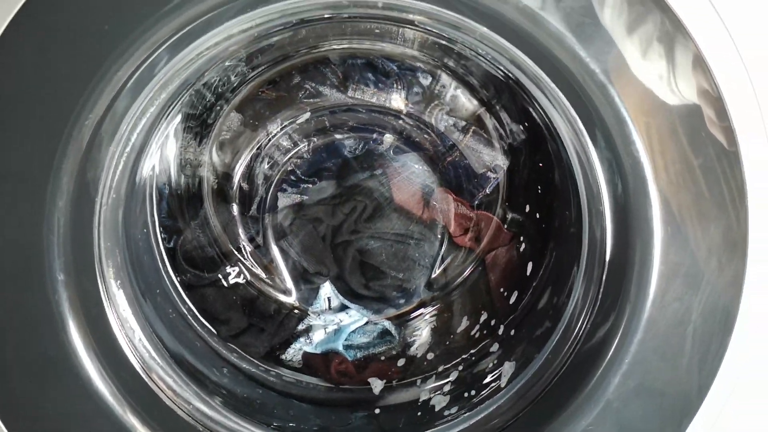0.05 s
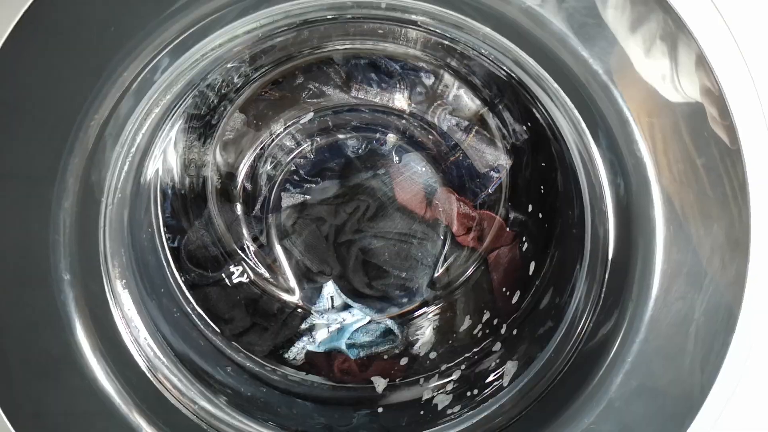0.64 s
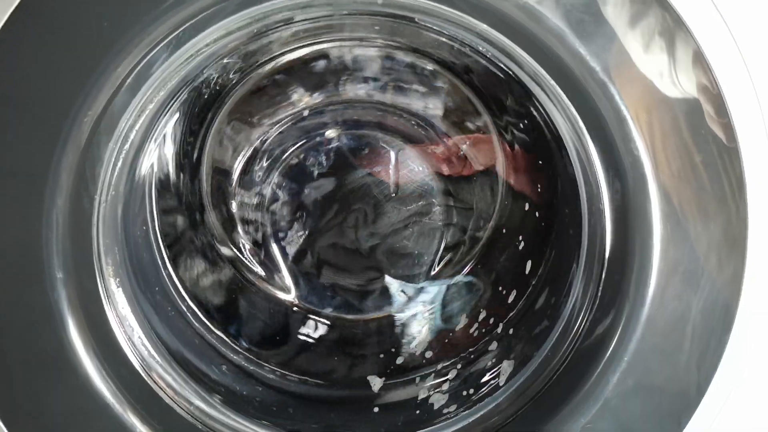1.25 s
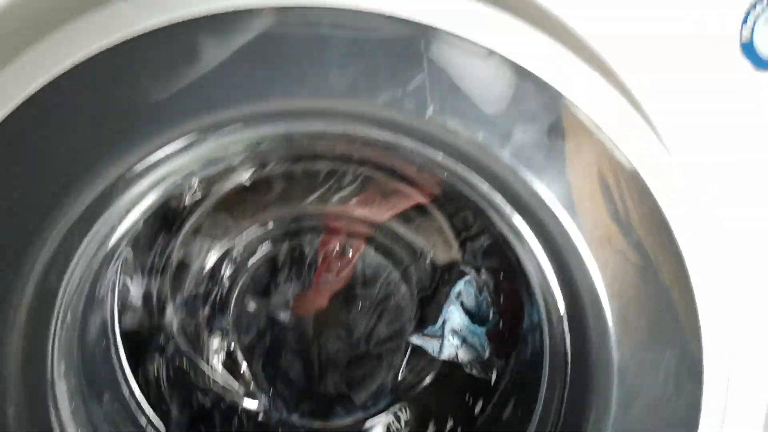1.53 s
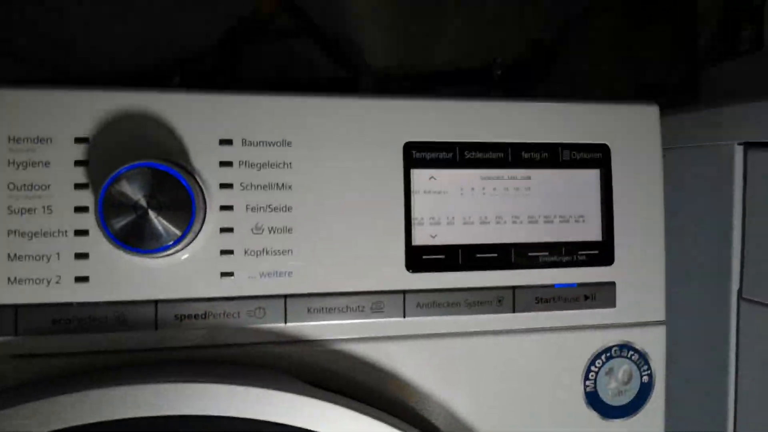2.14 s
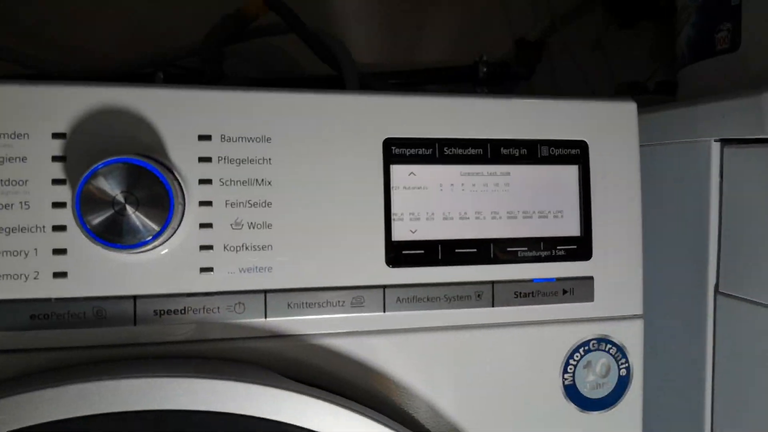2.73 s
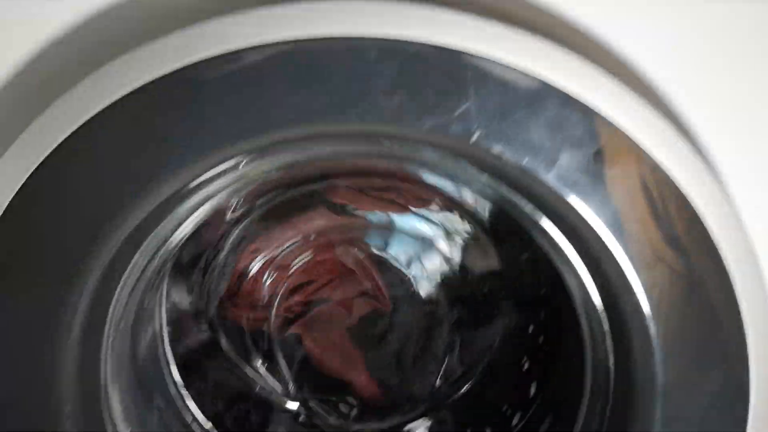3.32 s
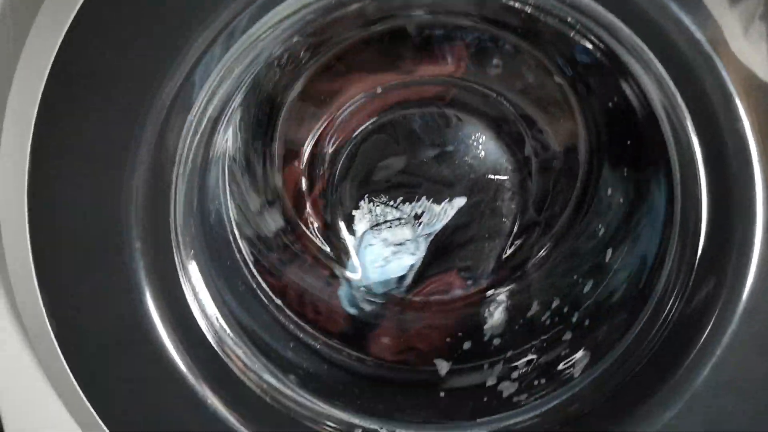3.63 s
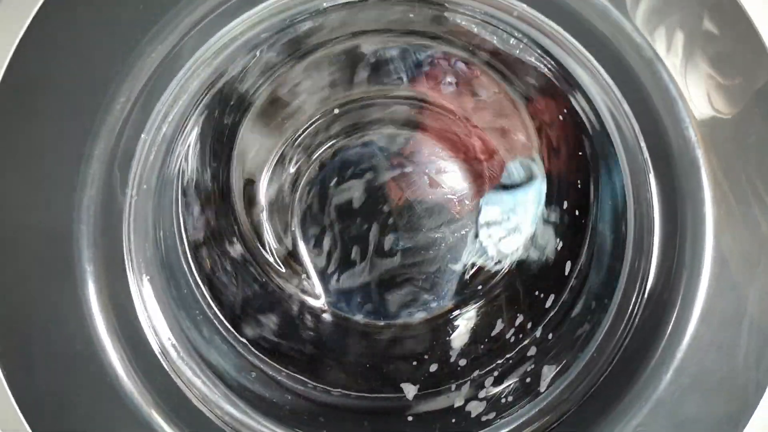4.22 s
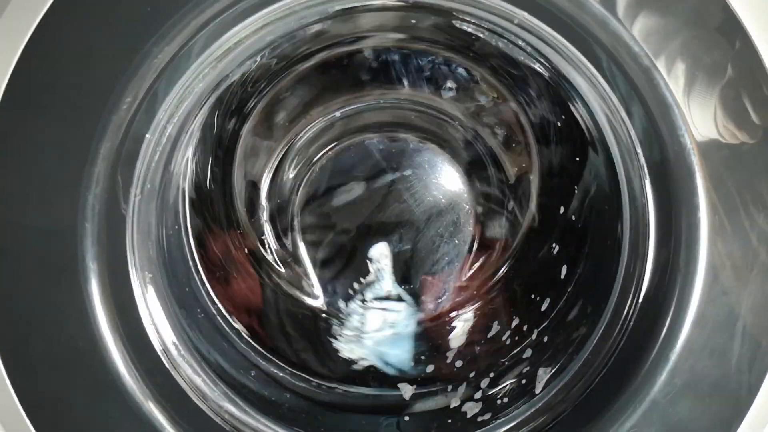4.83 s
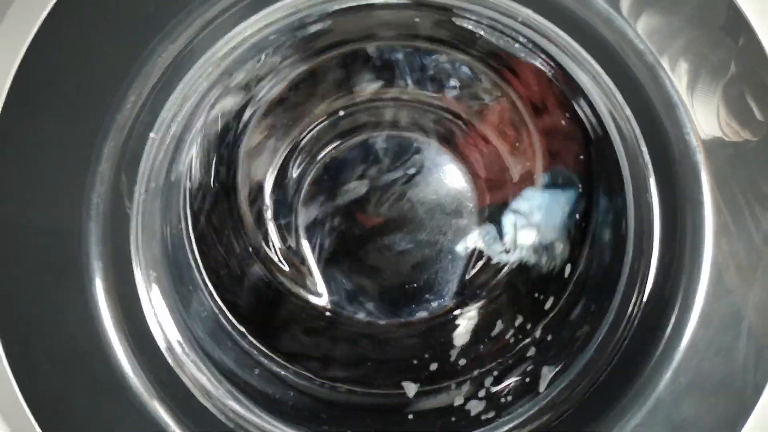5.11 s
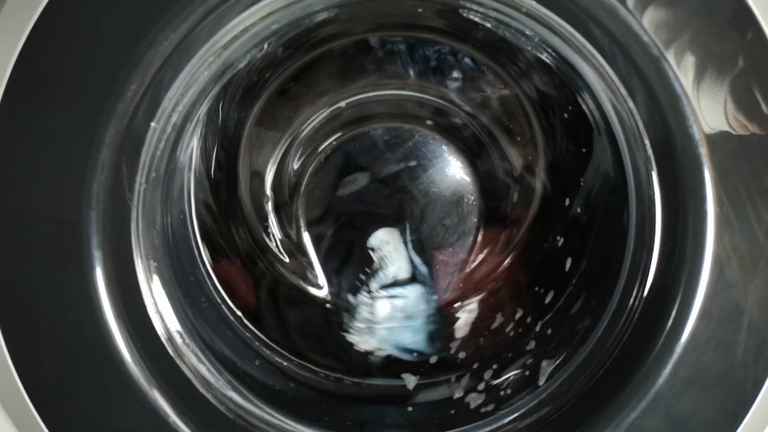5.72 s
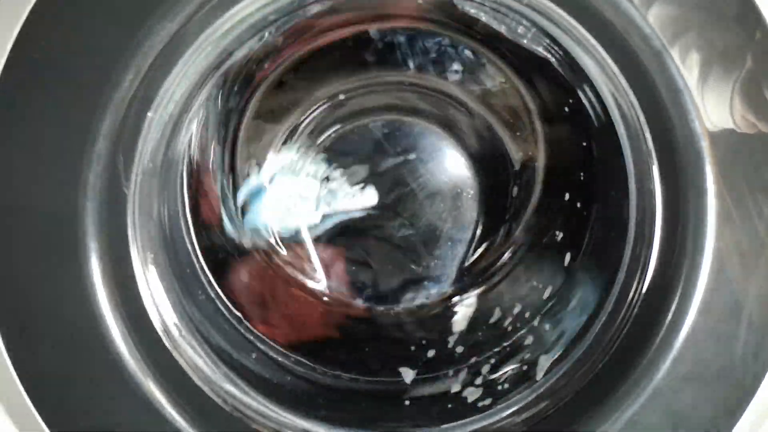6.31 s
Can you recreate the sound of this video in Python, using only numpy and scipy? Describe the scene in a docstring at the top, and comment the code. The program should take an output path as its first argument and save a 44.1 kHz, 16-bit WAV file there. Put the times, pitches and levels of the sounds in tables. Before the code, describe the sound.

A front-loading washing machine turns wet laundry, heard close to its door in a small hard room. A low electric hum with a deep tub rumble runs throughout, swelling and dipping briefly at uneven intervals. Behind the glass, quieter water sloshes and gurgles while wet cloth swishes, drips and lightly slaps the drum. The hum is strong for the first 1.6 seconds, then sinks low from about 1.8 to 3.4 seconds as the water continues. A small hard part gives a bright tick at about 3.2 seconds. The hum swells again at 3.5 seconds. Very faint cloth squeaks come around 1.2, 1.6 and 3.7 seconds, and clearer wet slaps at 4.3. At about 4.7 seconds something hard knocks sharply on the door, which rings briefly. From 5.3 seconds the hum is at its loudest, with another slap and tick near 5.9, continuing to about 6.4 seconds.

```python
"""Small hard room, close to the door of a front-loading washing machine turning wet laundry.
The machine hums at twice the mains rate. The hum swells and dips briefly; tub rumble and water
rise and fall with it. Behind the glass water sloshes and wet cloth swishes, slaps, drips and squeaks.
Small hard parts tick; one knocks loudly on the door and rings its modes."""
import sys
import numpy as np
from scipy import signal
from scipy.io import wavfile
from scipy.ndimage import uniform_filter1d

SR = 44100
rng = np.random.default_rng(int(sys.argv[2]) if len(sys.argv) > 2 else 0)


def master(y):
    """Save y as 16-bit WAV."""
    cut = np.clip(np.atleast_2d(y).T, -1, 1)
    pcm = np.round(cut * 32767)  # scale
    wavfile.write(sys.argv[1], SR, pcm.astype(np.int16))


N = 280476

# hum level before dips: t/s, level/dB
HUM_LEVEL = [(0.0, -30.5), (0.4, -38), (0.66, -29.0), (1.15, -31.5), (1.21, -38), (1.62, -30),
             (1.87, -48.0), (2.59, -50.5), (2.69, -43.5), (2.94, -38.0), (3.01, -43), (3.38, -46),
             (3.52, -32.0), (4.02, -41), (4.49, -30.5), (4.92, -33.5), (5.09, -35.5), (5.29, -28.5),
             (5.58, -27.0), (5.92, -31.5), (6.19, -26.5), (6.36, -27.5)]
# brief dips of hum, rumble and wash: t at bottom/s, recovery/s, depth in the hum/dB
DIPS = [(0.041, 0.088, 9), (0.275, 0.064, 13), (1.307, 0.018, 10), (1.503, 0.15, 13), (1.798, 0.091, 8),
        (2.214, 0.045, 10), (2.995, 0.24, 9.5), (3.255, 0.08, 11), (3.637, 0.1, 6), (3.845, 0.1, 12.5),
        (4.145, 0.027, 9.5), (4.65, 0.14, 15.5), (4.804, 0.075, 12.5), (4.94, 0.15, 13), (5.187, 0.04, 6.5)]
# motor and pump buzz: mains multiple, level/dB, share of rumble swell, left minus right/dB
BUZZ_LINES = [(1, -56, 0.87, 6), (3, -67, 0.37, 3.5), (4, -60.5, 1, 0.5), (5, -65, 0.54, -2.5),
              (6, -57, 0.64, -2), (7, -82.5, 1.7, -4), (10, -82.5, 0.75, 0.5)]
# door modes: f/Hz, level/dB, t60/s
DOOR_MODES = [(128, -31, .11), (168, -28, .08), (240, -43, .05), (301, -46, .07), (463, -49, .15),
              (700, -45, .045), (1000, -45, .05), (1210, -50, .08), (1690, -50, .1), (1879, -51, .1),
              (1972, -50, .11), (2051, -49, .13), (2283, -45, .14), (2500, -48, .04), (2945, -52, .06),
              (3165, -52, .06), (4450, -45, .016), (4775, -48, .018), (7418, -44, .014), (11300, -44, .009)]
# noise spectra: f/Hz, relative density/dB
RUMBLE_SPECTRUM = [(20, -4), (32, -1.5), (45, -7), (62, -12.5), (85, 8.5), (115, 5), (160, -8), (220, -17),
                   (290, -5), (350, -47), (450, -32)]
GURGLE_SPECTRUM = [(280, -12.5), (400, 2), (520, 3), (650, -10.5), (780, -3), (1000, -21)]
SLOSH_SPECTRUM = [(600, -17), (850, -2.5), (1050, -6.5), (1400, -5.5), (1800, -4), (2600, -13.5)]
SPLASH_SPECTRUM = [(1100, -23.5), (1600, -4), (2200, 3.5), (2700, -2.5), (3500, -2), (4500, -16),
                   (6500, -33.5)]
SPRAY_SPECTRUM = [(2800, -5), (4200, -1), (5600, 4.5), (7200, -1.5), (8300, -9), (9600, 0), (11500, -13.5),
                  (13500, -14), (16000, -23.5)]
HISS_SPECTRUM = [(1500, 0), (3000, -6.5), (6000, -0.5), (9000, -3.5), (12000, -2), (16000, -3)]
# left-right likeness of the noise: f/Hz, correlation
CORRELATION = [(50, 1), (150, 0.89), (300, 0.89), (450, -0.64), (700, -0.11), (1400, 0.21), (3000, -0.22),
               (12000, 0.046)]
# wet cloth hitting drum and glass: t/s, peak/dB, centre f/Hz, relative half-width
SLAPS = [(0.196, -53.5, 5100, 0.095), (0.358, -56, 5500, 0.15), (0.377, -50.5, 2970, 0.12),
         (0.453, -55.5, 9500, 0.069), (0.546, -48, 4760, .34), (0.684, -50.5, 7850, 0.14),
         (0.708, -48, 2630, 0.13), (1.184, -53.5, 2880, 0.11), (1.273, -49.5, 5800, 0.38),
         (1.501, -52.5, 5430, .18), (2.208, -57.5, 3200, .1), (2.226, -53, 2600, 0.13),
         (2.295, -53, 2070, .12), (2.330, -55, 4170, .2), (2.45, -50, 4300, 0.11), (2.498, -57, 8900, 0.28),
         (2.600, -52, 3660, 0.42), (2.760, -47, 6400, 0.26), (2.873, -58, 5880, 0.16),
         (2.951, -53, 2700, 0.18), (3.012, -56, 6240, 0.11), (3.353, -47.5, 4650, 0.46),
         (3.504, -52, 7200, 0.21), (3.556, -50, 7040, .26), (3.83, -54.5, 5970, 0.12),
         (3.876, -53.5, 6180, 0.3), (4.131, -49, 4750, .73), (4.288, -43.5, 2180, 0.18),
         (4.326, -46, 2900, 0.47), (4.916, -58.5, 9700, 0.099), (5.112, -47.5, 5770, .35),
         (5.354, -59, 7450, 0.1), (5.420, -51.5, 2250, .16), (5.787, -53.5, 8200, .17),
         (5.831, -53.5, 6440, .25), (5.881, -41.5, 6340, 0.29), (6.163, -48.5, 8950, .12),
         (6.222, -48, 4200, 0.096), (6.296, -56, 7300, .15), (6.337, -46, 2120, 0.18)]
# folds dragging water: mid t/s, length/s, level/dB, centre f/Hz
SWISHES = [(0.077, .14, -76, 1500), (0.189, 0.12, -70, 3580), (0.709, 0.21, -59.5, 2770),
           (1.057, 0.13, -65.5, 4200), (1.146, 0.13, -58, 1560), (1.483, 0.12, -68, 5300),
           (1.65, 0.13, -71, 5700), (1.893, .14, -65, 2500), (2.13, .12, -66.5, 3000),
           (2.852, .3, -74, 900), (2.919, .2, -63.5, 2460), (3.122, .08, -67, 2070),
           (3.544, 0.19, -63.5, 2340), (3.657, 0.27, -67, 1170), (3.734, 0.16, -65, 2400),
           (4.39, 0.17, -67.5, 3780), (4.567, 0.21, -60, 2200), (5.357, 0.29, -64.5, 1960),
           (5.477, .4, -69, 670), (6.045, 0.3, -68.5, 624), (6.277, 0.15, -64.5, 2420)]
# small hard parts: t/s, peak/dB, centre f/Hz, relative half-width, t60/s
TICKS = [(3.153, -35, 7800, .2, .003), (3.1575, -37, 12000, .17, .007), (3.251, -56, 13500, .2, .01),
         (3.269, -52, 9500, .4, .004), (5.882, -44, 6600, .35, .004)]
# cloth rubbing glass: t/s, length/s, start f/Hz, end f/Hz, level/dB
SQUEAKS = [(1.21, .14, 5700, 5700, -75), (1.2, .16, 2210, 2190, -70), (1.58, .2, 1590, 1520, -73),
           (3.58, .16, 1370, 1300, -65), (3.68, .22, 1270, 1320, -69)]
# drum resonances: f/Hz, bandwidth/Hz, gain of added band/dB
DRUM_MODES = [(656, 91, 6), (995, 34, 1), (1080, 48, 2), (1556, 77, -4.5), (2370, 43, -2.5),
              (2153, 91, -10), (2940, 5.7, -12), (5610, 130, -2), (6940, 120, 0), (7410, 190, -1.5),
              (9360, 270, -4), (11100, 170, -0.5)]

MAINS_HZ, USUAL_HUM_DB = 49.99, -36
# layers that follow the hum: level at usual hum/dB, share of the hum's swing
RUMBLE_LEVEL, GURGLE_LEVEL = (-48, 0.54), (-70, 0.36)
SLOSH_LEVEL, SPLASH_LEVEL, SPRAY_LEVEL = (-67.5, 0.26), (-69.5, 0.11), (-76, 0.29)


def hum(level_db, flutter_db, wobble_rad):
    """Vibration at twice the mains rate; level and phase flutter."""
    phase = 2 * np.pi * 2 * MAINS_HZ * np.arange(N) / SR + wobble_rad * drift(6)
    smooth_db = uniform_filter1d(level_db, SR // 100)   # over one hum cycle
    return np.sqrt(2) * from_db(smooth_db + flutter_db * drift(8.3)) * np.sin(phase)


def motor(hum_db, swing_db, throb_hz, throb_db, right_lag_s):
    """Hum, deep throb and mains-harmonic buzz of motor and pump; left side leads."""
    swell_db = RUMBLE_LEVEL[1] * (swing_db - np.mean(swing_db))
    out = hum(hum_db, flutter_db=1.0, wobble_rad=0.22)
    out += tone(throb_hz, throb_db + 0.54 * swell_db, flutter_db=0, wobble_rad=0.5)
    for multiple, level_db, share, pan_db in BUZZ_LINES:
        line = tone(multiple * MAINS_HZ, level_db + share * swell_db, flutter_db=2.3, wobble_rad=0.43)
        out = out + line * from_db([[pan_db / 2], [-pan_db / 2]])
    t = np.arange(N) / SR
    return np.array([out[0], np.interp(t - right_lag_s, t, out[1])])


def tub_rumble(swing_db):
    """Low tub noise, rising and falling with the hum."""
    return follow(RUMBLE_LEVEL, swing_db) * banded_noise(RUMBLE_SPECTRUM, flicker_db=1.85, rate_hz=3.4)


def door_knock(at_s, crack_db, clatter_db, snap_db, spread_s):
    """A hard part strikes the door: modes ring under the contact noise, sides slightly apart."""
    blow = np.zeros(N)
    blow[round(at_s * SR)] = 1
    contact = [(at_s, crack_db, 2200, .22, .14),
               (at_s, clatter_db, 1500, 2.5, .1),
               (at_s, snap_db, 7000, .6, .06)]
    out = bursts(contact, attack_s=0.00038, grit_db=-3, skirt_db=-19)
    for hz, level_db, t60_s in DOOR_MODES:
        mode = from_db(level_db) * ring(blow, hz, t60_s)
        out += [mode, np.roll(mode, round(rng.uniform(-spread_s, spread_s) * SR))]
    return out


def wash(swing_db):
    """Moving water: (noise of gurgle, slosh, splash and spray; droplets of the upper three)."""
    gurgle, slosh, splash, spray = (
        follow(level, swing_db) for level in (GURGLE_LEVEL, SLOSH_LEVEL, SPLASH_LEVEL, SPRAY_LEVEL))
    water = gurgle * banded_noise(GURGLE_SPECTRUM, flicker_db=3, rate_hz=14)
    water += slosh * banded_noise(SLOSH_SPECTRUM, flicker_db=2, rate_hz=11)
    water += splash * banded_noise(SPLASH_SPECTRUM, flicker_db=2, rate_hz=30)
    water += spray * banded_noise(SPRAY_SPECTRUM, flicker_db=3.5, rate_hz=9.3)
    water *= from_db(1.53 * drift(10))   # surges as folds turn over
    drops = from_db(-4.5) * slosh * droplets(SLOSH_SPECTRUM, per_s=150, range_db=14, t60_cycles=22)
    drops += from_db(-3.5) * splash * droplets(SPLASH_SPECTRUM, per_s=150, range_db=16, t60_cycles=24)
    drops += from_db(-4.5) * spray * droplets(SPRAY_SPECTRUM, per_s=71, range_db=16.5, t60_cycles=24)
    return water, drops


def droplets(spectrum, per_s, range_db, t60_cycles, pitches=20):
    """Drops and bubbles ringing briefly, random in time and pan; rms 1."""
    out, duration_s = np.zeros((2, N)), N / SR
    for hz in np.geomspace(spectrum[1][0], spectrum[-2][0], pitches):
        when, size, left, right, chance = rng.random((400, 5)).T
        born = chance < per_s * duration_s / pitches / len(chance)
        heights = born * from_db(range_db * size ** 2)   # most are small
        clicks = np.zeros((2, N))
        clicks[:, (when * (N - 1)).astype(int)] = heights * (np.array([left, right]) - .5)
        out += from_db(at_hz(spectrum, hz)) * hz * ring(clicks, hz, t60_cycles / hz)
    return rms_one(out)


def slaps(t60_s):
    """Wet cloth hits drum and glass."""
    return bursts([(*slap, t60_s) for slap in SLAPS], attack_s=0.0007, grit_db=2.5, skirt_db=-18)


def drips(swing_db, per_s, low_hz, high_hz, level_db, spread_db, db_per_octave, half_width, t60_s):
    """Random small wet contacts; louder as the hum swells, fainter at high pitch."""
    when, pitch, size, chance = rng.random((150, 4)).T
    at = (when * (N - 1)).astype(int)
    hz = low_hz * (high_hz / low_hz) ** pitch
    peak_db = level_db + .25 * swing_db[at] + spread_db * (2 * size - 1)
    peak_db += db_per_octave * np.log2(hz / low_hz)
    falls = chance < per_s * N / SR / len(chance)
    rows = [(*row, half_width, t60_s) for row in np.transpose([at / SR, peak_db, hz])[falls]]
    return bursts(rows, attack_s=0.0007, grit_db=2.5, skirt_db=-18)


def swishes(half_width, grit_db, skirt_db):
    """Sliding wet cloth drags water: grainy band noise, swelling and fading."""
    out = np.zeros((2, N))
    for mid_s, length_s, level_db, hz in SWISHES:
        size = round(length_s * SR)
        grit = from_db(grit_db * np.repeat(rng.standard_normal(SR), 64)[:size])
        spatter = rng.standard_normal((2, SR))[:, :size] * grit
        core = band(spatter, hz / (1 + half_width), hz * (1 + half_width))
        skirt = from_db(skirt_db) * band(spatter, hz / 2, hz * 2)
        add(out, mid_s - length_s / 2, from_db(level_db) * rms_one(core + skirt) * np.hanning(size))
    return out


def hard_ticks():
    """Small hard parts make short, bright contacts."""
    return bursts(TICKS, attack_s=.0001, grit_db=3, skirt_db=-25)


def squeaks(roughness, waver):
    """Stick-slip of cloth on glass: thin, unsteady glides."""
    out = np.zeros((2, N))
    for start_s, length_s, start_hz, end_hz, level_db in SQUEAKS:
        progress = np.clip((np.arange(N) / SR - start_s) / length_s, 0, 1)
        hz = (start_hz + (end_hz - start_hz) * progress) * (1 + waver * drift(57))
        glide = np.sin(2 * np.pi * np.cumsum(hz) / SR) * np.sin(np.pi * progress)
        out += from_db(level_db) * glide * (1 + roughness * np.array([drift(35), drift(40)]))
    return out


def drum(x):
    """The steel drum lifts narrow bands of the sound inside it."""
    return x + sum(from_db(gain_db) * signal.lfilter(*signal.iirpeak(hz, hz / width_hz, fs=SR), x)
                   for hz, width_hz, gain_db in DRUM_MODES)


def room(x, t60_s, loops=10):
    """Drum and room reflections: feedback delays, then allpass scatter."""
    out = np.zeros((2, N))
    for side in range(2):
        for k, lag in enumerate((rng.uniform(.004, .03, loops) * SR).astype(int)):
            loop, gain = x[side].copy(), from_db(-60 * lag / SR / t60_s)
            for i in range(lag, N, lag):
                loop[i:i + lag] += gain * loop[i - lag:i][:N - i]
            out[side] += (loop - x[side]) * (-1) ** k * np.sqrt((1 - gain ** 2) / loops)
        for lag in rng.integers(40, 170, 2):
            taps = np.r_[.6, np.zeros(lag), 1]
            out[side] = signal.lfilter(taps, taps[::-1], out[side])
    return out


def hiss(level_db):
    """Faint, flickering treble."""
    return from_db(level_db) * banded_noise(HISS_SPECTRUM, flicker_db=4.5, rate_hz=5)


def dips_db(fall_s):
    """Dip depth per sample: quick fall, accelerating recovery."""
    t, total_db = np.arange(N) / SR, 0
    for bottom_s, recovery_s, depth_db in DIPS:
        fall = np.clip((t - bottom_s) / fall_s + 1, 0, 1)
        recovery = np.clip((t - bottom_s) / recovery_s, 0, 1) ** 2
        total_db += depth_db * fall * (1 - recovery)
    return total_db


def follow(level, swing_db):
    """Gain of a layer that takes a share of the hum's swing."""
    usual_db, share = level
    return from_db(usual_db + share * swing_db)


def tone(hz, level_db, flutter_db, wobble_rad):
    """Slightly wavering sine."""
    phase = 2 * np.pi * (hz * np.arange(N) / SR + rng.random()) + wobble_rad * drift(4.7)
    return np.sqrt(2) * from_db(level_db + flutter_db * drift(30)) * np.sin(phase)


def bursts(rows, attack_s, grit_db, skirt_db):
    """Contacts, each a decaying, band-passed spatter of tiny impacts."""
    out, t = np.zeros((2, N)), np.arange(SR // 4) / SR
    for start_s, peak_db, hz, half_width, t60_s in rows:
        grit = from_db(grit_db * np.repeat(rng.standard_normal(len(t)), 32)[:len(t)])
        envelope = (1 - np.exp(-t / attack_s)) * from_db(-60 * t / t60_s)
        spatter = rng.standard_normal((2, len(t))) * grit * envelope
        core = band(spatter, hz / (1 + half_width), hz * (1 + half_width))
        sound = core + from_db(skirt_db) * band(spatter, hz / 2, min(hz * 2, 12000))
        add(out, start_s, from_db(peak_db) * sound / np.abs(sound).max())
    return out


def banded_noise(spectrum, flicker_db, rate_hz):
    """Stereo noise in independently flickering third-octaves; rms 1."""
    bottom_hz, top_hz = spectrum[0][0], spectrum[-1][0]
    edges_hz = np.geomspace(bottom_hz, top_hz, round(3 * np.log2(top_hz / bottom_hz)) + 1)
    out, white = 0, rng.standard_normal((2, 2, N))
    for k, (low_hz, high_hz) in enumerate(zip(edges_hz, edges_hz[1:])):
        mid, side = band(white[k % 2], low_hz, high_hz)
        hz = np.sqrt(low_hz * high_hz)
        alike = at_hz(CORRELATION, hz)
        gain = from_db(at_hz(spectrum, hz) + flicker_db * drift(rate_hz))
        out += gain * (np.sqrt(1 + alike) * mid + np.sqrt(1 - alike) * side * [[1], [-1]])
    return rms_one(out)


def drift(rate_hz):
    """Smooth random motion; rms 1."""
    hop, settle = 40, 2000
    pole = np.exp(-2 * np.pi * rate_hz * hop / SR)
    white = rng.standard_normal(N // hop + settle + 2)
    slow = signal.lfilter([1], [1, -2 * pole, pole * pole], white)[settle:]
    return np.interp(np.arange(N) / hop, np.arange(len(slow)), rms_one(slow))


def ring(clicks, hz, t60_s):
    """Resonator: unit click in, decaying unit sine out."""
    r, w = from_db(-60 / (t60_s * SR)), 2 * np.pi * hz / SR
    return signal.lfilter([0, np.sin(w)], [1, -2 * r * np.cos(w), r * r], clicks + 1e-18)


def band(x, low_hz, high_hz, order=2):
    """Butterworth band-pass."""
    sos = signal.butter(order, [low_hz, min(high_hz, .48 * SR)], "band", fs=SR, output="sos")
    return signal.sosfilt(sos, x)


def add(out, start_s, sound):
    """Mix in at start_s."""
    at = max(round(start_s * SR), 0)
    out[..., at:at + sound.shape[-1]] += sound[..., :N - at]


def at_hz(table, hz):
    """Interpolate over log frequency."""
    table_hz, values = np.transpose(table)
    return np.interp(np.log(hz), np.log(table_hz), values)


def from_db(db):
    """dB to gain."""
    return 10 ** (np.asarray(db) / 20)


def rms_one(x):
    """Scale to rms 1."""
    return x / np.sqrt(np.mean(x ** 2) + 1e-20)


def scene():
    """Hum and rumble come through the cabinet; water and contacts also echo."""
    hum_db = np.interp(np.arange(N) / SR, *np.transpose(HUM_LEVEL)) - dips_db(fall_s=.031)
    swing_db = hum_db - USUAL_HUM_DB
    cabinet = motor(hum_db, swing_db, throb_hz=38.84, throb_db=-54, right_lag_s=0.00026)
    cabinet += tub_rumble(swing_db)
    water, drops = wash(swing_db)
    cloth = slaps(t60_s=0.16)
    cloth += drips(swing_db, per_s=7, low_hz=2380, high_hz=9700, level_db=-59, spread_db=9.5,
                   db_per_octave=-4, half_width=0.14, t60_s=0.13)
    cloth += swishes(half_width=0.25, grit_db=4, skirt_db=-13.5)
    cloth += squeaks(roughness=0.64, waver=0.0121)
    ticks = hard_ticks()
    door = door_knock(at_s=4.7463, crack_db=-34.5, clatter_db=-37.5, snap_db=-41, spread_s=0.00031)
    inside = drum(water + from_db(-4.5) * drops + cloth)
    room_send = from_db(-4.5) * inside + drops + from_db(-5.5) * ticks
    room_send += from_db(-0.5) * band(door, 290, 11000, order=1)
    return cabinet + door + inside + ticks + hiss(level_db=-79) + room(room_send, t60_s=0.19)


def record(dry):
    """Steep elliptic low-pass."""
    cutoff_hz = 15750
    return signal.sosfilt(signal.ellip(10, .1, 80, cutoff_hz, fs=SR, output="sos"), dry)


dry = scene()
out = record(dry)
master(out)
```